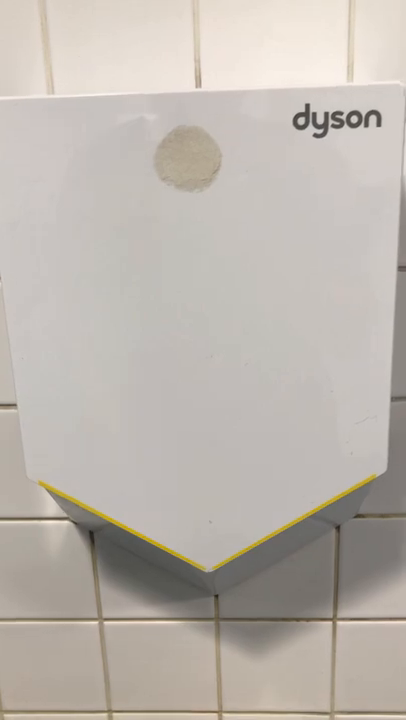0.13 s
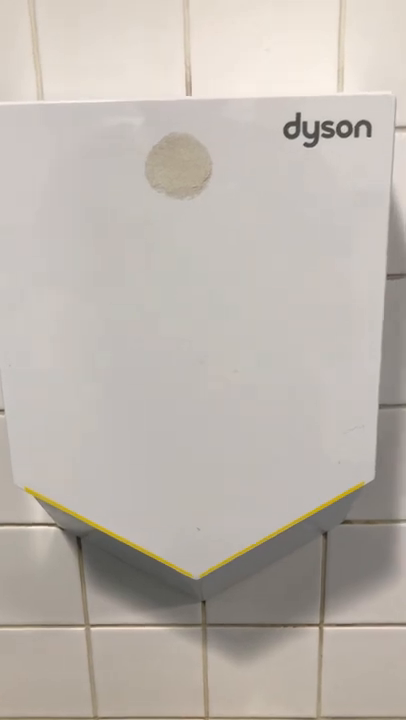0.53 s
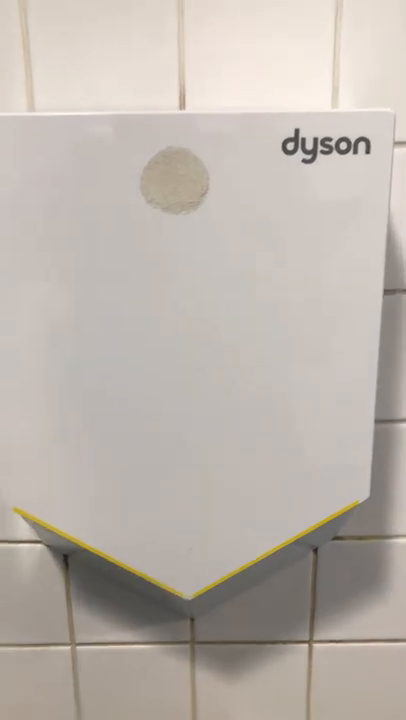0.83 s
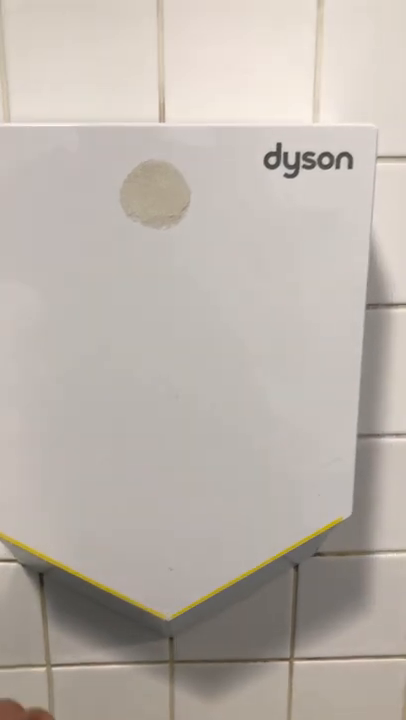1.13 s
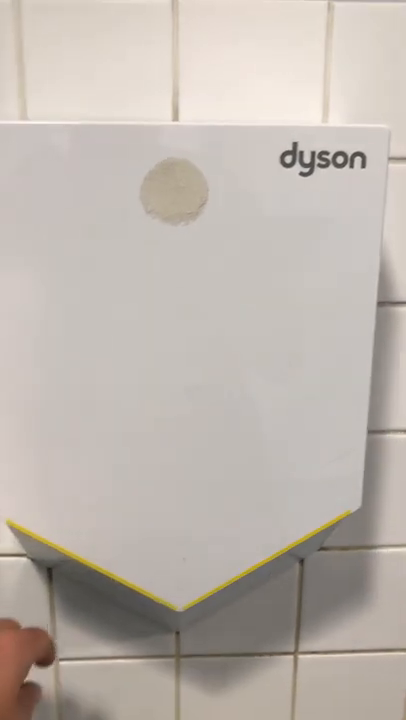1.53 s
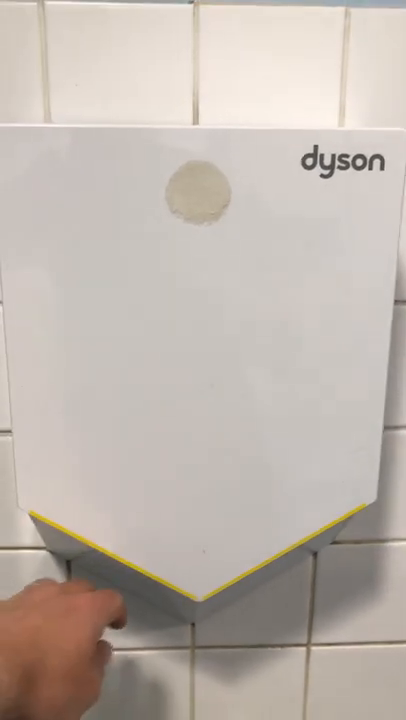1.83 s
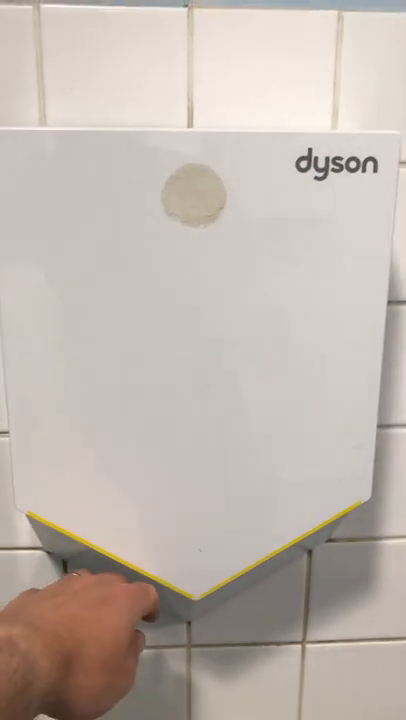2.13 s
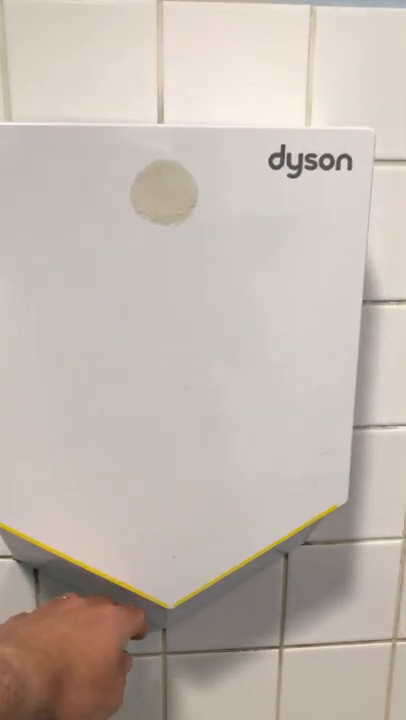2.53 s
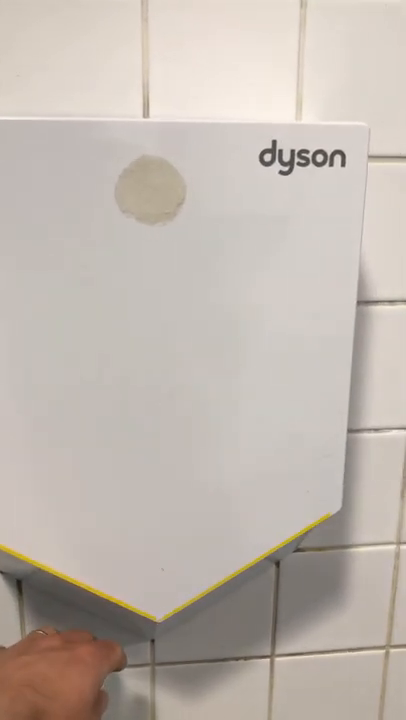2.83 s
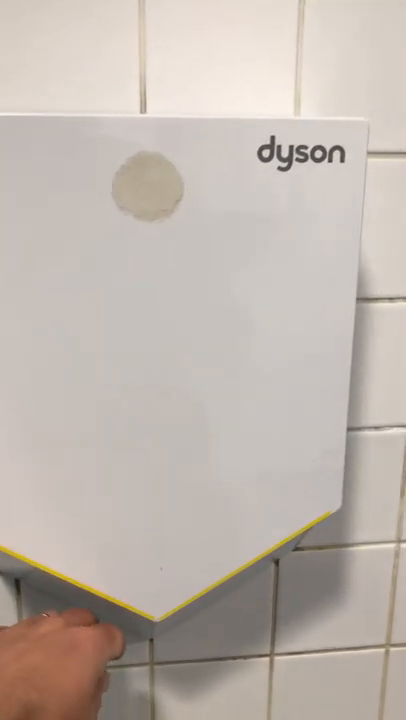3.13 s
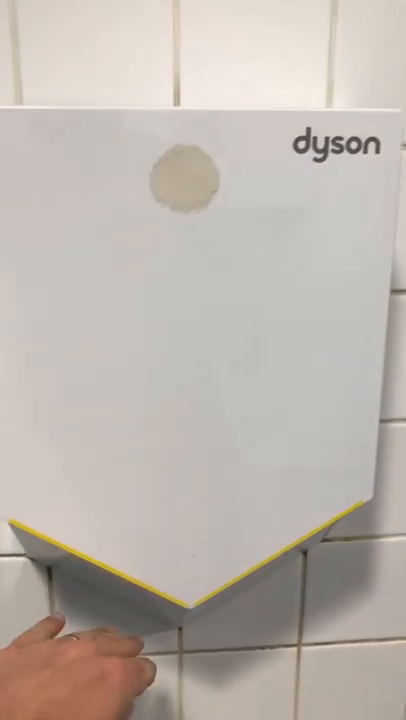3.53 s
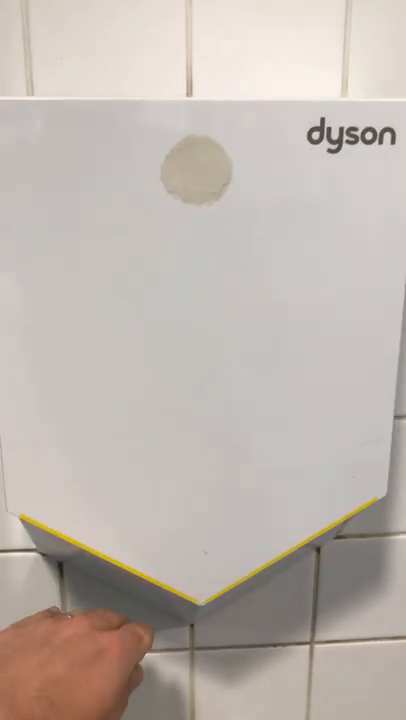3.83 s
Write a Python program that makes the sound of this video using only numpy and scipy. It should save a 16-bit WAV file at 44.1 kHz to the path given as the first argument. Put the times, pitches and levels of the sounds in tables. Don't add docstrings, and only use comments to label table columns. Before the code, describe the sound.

After a quiet washroom lull, a wall hand dryer ticks, spins up and roars with air

```python
import sys
import numpy as np
from scipy import signal
from scipy.fft import rfft, irfft, next_fast_len
from scipy.io import wavfile
from scipy.ndimage import uniform_filter1d, map_coordinates

SR = 44100
rng = np.random.default_rng(int(sys.argv[2]) if len(sys.argv) > 2 else 0)


def wav_out(sig):
    wavfile.write(sys.argv[1], SR, np.round(np.clip(np.atleast_2d(sig).T, -1, 1) * 32767).astype(np.int16))


def undo_db(level):
    steps = np.asarray(level, float) / 20
    return 10 ** steps


N = 176400
T = np.arange(N) / SR


def unit(x):
    return x / np.sqrt(np.mean(x ** 2) + 1e-20)


def along(points, hz):
    f, v = np.transpose(points)
    return np.interp(np.log(hz + 1), np.log(f + 1), v)


def curves(rows):
    s, *cols = np.transpose(rows)
    return [np.interp(T, s, c) for c in cols]


def wobble(rate_hz):
    knots = rng.standard_normal(int(N * rate_hz / SR) + 4)
    return map_coordinates(knots, [T * rate_hz])


def sine(hz):
    return np.sin(2 * np.pi * np.cumsum(hz) / SR)


def filtered(x, response):
    m = next_fast_len(N + SR // 2)
    return irfft(rfft(x, m) * response(np.fft.rfftfreq(m, 1 / SR)), m)[..., :N]


def peak(f, hz, width_hz):
    return 1j * f * width_hz / (hz * hz - f * f + 1j * f * width_hz)


def rush(spectrum, patchy_db):
    z = signal.stft(rng.standard_normal(N), nperseg=512)[2]
    field = uniform_filter1d(rng.standard_normal(z.shape), 6, 0)
    field = uniform_filter1d(field, 10, 1)
    x = signal.istft(z * undo_db(patchy_db * unit(field)), nperseg=512)[1][:N]
    return unit(filtered(x, lambda hz: undo_db(along(spectrum, hz))))


def swelling_tones(rows):
    total = np.zeros(N)
    for start_s, hz, db, length_s in rows:
        swell = np.sin(np.pi * np.clip((T - start_s) / length_s, 0, 1))
        tone = sine(hz * (1 + .012 * wobble(90)))
        total += undo_db(db + 2.5 * wobble(120)) * swell * tone
    return total


# frequency in Hz, level in dB.
VENT_SPECTRUM = [(20, -6), (170, -3.5), (450, -12.5), (750, -14.5), (1200, -16.5), (2200, -25.5),
                 (3500, -43), (8000, -46)]
# frequency in Hz, width in Hz, level in dB.
DUCT_WHISTLES = [(70.6, 30, -64.5), (101.36, 12, -71), (563, 27, -79), (750, 25, -80), (918, 20, -73),
                 (997, 40, -76), (1500, 30, -82), (2030, 110, -81)]
# time in seconds, level in dB.
PLUMBING_LEVEL = [(0, -69.5), (.3, -68), (.9, -68), (1.1, -70.5), (1.7, -69.5), (2.1, -68.5), (2.45, -69)]
# frequency in Hz, level in dB.
PLUMBING_SPECTRUM = [(800, -20), (2000, 0), (4000, -4), (6500, -6), (9000, -9), (12000, -11), (15800, -10)]


def washroom():
    whistles = np.zeros(N)
    for hz, width_hz, db in DUCT_WHISTLES:
        tone = unit(filtered(rng.standard_normal(N), lambda f: peak(f, hz, width_hz) ** 2))
        waver_db = 1.8 * (hz > 500) * wobble(5)
        whistles += undo_db(db + waver_db) * tone
    plumbing = undo_db(curves(PLUMBING_LEVEL)[0]) * rush(PLUMBING_SPECTRUM, patchy_db=-1.5)
    vent = undo_db(-60 + .5 * wobble(3)) * rush(VENT_SPECTRUM, patchy_db=1)
    return vent + plumbing + whistles


# time in seconds, frequency in Hz, level in dB.
PIPE_SONG = [(0, 990, -69), (.59, 985, -68), (.72, 998, -72), (.82, 988, -63), (.9, 990, -67),
             (.98, 990, -62), (1.1, 992, -67), (1.37, 984, -66), (1.42, 985, -78), (1.54, 988, -63),
             (1.67, 991, -72), (1.74, 986, -63), (1.79, 988, -72), (1.93, 997, -63), (2.03, 995, -68),
             (2.18, 994, -74), (2.245, 994, -62), (2.3, 995, -72)]
# start in seconds, frequency in Hz, level in dB, length in seconds.
PIPE_SQUEAKS = [
    (1.755, 550, -63, .1),
    (1.64, 3280, -79, .28),
    (.04, 560, -66, .13),
    (2.08, 3820, -80, .3),
    (2.26, 1320, -65, .08),
]


def pipe():
    hz, db = curves(PIPE_SONG)
    song = undo_db(db + 2.5 + 1.5 * wobble(35)) * sine(hz + 3 + 4 * wobble(30))
    return song + swelling_tones(PIPE_SQUEAKS)


# frequency in Hz, level in dB.
HUM = [(100, -41), (200, -38.5), (300, -52)]


def supply():
    hum = np.zeros(N)
    for hz, db in HUM:
        hum += undo_db(db + 3.5 + 1.2 * wobble(7)) * np.sin(2 * np.pi * hz * T)
    load = np.clip((T - 2.5) / 0.16, 0, 1) ** 1.3
    return load * hum


# start in seconds, length in seconds, level in dB.
SLEEVE_BRUSHES = [
    (1.196, 0.055, -63),
    (1.25, 0.175, -73.5),
    (2.05, 0.31, -78),
]
# frequency in Hz, level in dB.
CLOTH_SPECTRUM = [(1000, -30), (1800, -5), (2500, -2), (4000, -4), (5600, 0), (8000, -7), (15000, -14)]


def sleeve():
    shape = np.zeros(N)
    for start_s, length_s, db in SLEEVE_BRUSHES:
        rise = np.clip((T - start_s) / .012, 0, 1)
        fall = np.clip((start_s + length_s * 1.5 - T) / length_s, 0, 1)
        shape += undo_db(db) * rise * fall
    return shape * rush(CLOTH_SPECTRUM, patchy_db=.8)


# time in seconds, peak level in dB.
KNOCKS = [(1.8821, -41.5), (1.915, -52), (1.9609, -48), (2.0028, -45), (2.0294, -50), (2.063, -45),
          (2.1294, -49), (2.2413, -46), (2.2747, -45), (2.3094, -48), (2.3496, -54)]
# frequency in Hz, level in dB, t60 in seconds.
FITTING_MODES = [(1050, -5, .04), (1300, 0, .05), (1500, -4, .04), (1750, -1, .04), (1950, -4, .03),
                 (2750, -8, .03)]
# frequency in Hz, level in dB.
SCUFF_SPECTRUM = [(500, -19), (800, -5), (1300, 5), (2000, -4), (3000, -11), (4500, -29)]


def fitting():
    knocks, scuffs, t = np.zeros(N), np.zeros(N), T[:SR // 5]
    scuff_db, scuff_decay_s = -19, .055
    for start_s, db in KNOCKS:
        ring = np.zeros(len(t))
        for hz, mode_db, t60_s in FITTING_MODES:
            decay = undo_db(mode_db + rng.normal(0, 2.5) - 60 * t / t60_s)
            ring += decay * np.sin(2 * np.pi * hz * rng.normal(1, .05) * t)
        here = slice(round(start_s * SR), round(start_s * SR) + len(t))
        knocks[here] += undo_db(db - 14) * ring * (1 - np.exp(-t / .004))
        scuff = np.exp(-t / scuff_decay_s) * (1 - np.exp(-t / .006))
        scuffs[here] += undo_db(db + scuff_db) * scuff
    return knocks + scuffs * rush(SCUFF_SPECTRUM, patchy_db=3.5)


# time in seconds, level in dB.
RELAY_TICKS = [
    (2.483, -51.5),
    (2.497, -60),
    (2.507, -49),
]


def relay():
    bursts = np.zeros(N)
    for start_s, db in RELAY_TICKS:
        bursts += undo_db(db + 21) * (T >= start_s) * np.exp(-np.abs(T - start_s) / .0018)
    return bursts * rng.standard_normal(N)


# frequency in Hz, width in Hz, level in dB.
CASING_MODES = [(820, 70, -10), (1230, 70, -1), (1500, 110, 1), (1700, 110, 4), (1920, 130, 2),
                (2420, 200, -9), (3050, 150, -9), (3420, 120, 0), (4050, 150, -3), (4320, 150, 4),
                (4680, 150, -2)]


def casing(f):
    total = 0
    for k, (hz, width_hz, db) in enumerate(CASING_MODES):
        total = total + (-1) ** k * undo_db(db) * peak(f, hz, width_hz)
    return total / (1 + (f / 5600) ** 8)


# time in seconds, winding pulse rate in Hz, whine level in dB.
RUN_UP = [
    (2.497, 60, -90),
    (2.512, 320, -44),
    (2.54, 880, -43),
    (2.58, 1730, -35),
    (2.652, 3303, -36),
    (2.716, 4430, -34),
    (2.775, 5250, -27),
    (2.83, 5900, -22),
    (2.95, 6050, -40),
]
# time in seconds, level in dB.
BUZZ = [
    (2.497, -68),
    (2.51, -46),
    (2.55, -36.5),
    (2.6, -37),
    (2.7, -45),
    (3.05, -38),
]
# multiple of the pulse rate, level in dB.
WINDING_ORDERS = [(1, 0), (2, -3), (3, -2), (4, -7), (5, -10), (6, -12)]


def motor():
    rate_hz, whine_db = curves(RUN_UP)
    buzz_db = curves(BUZZ)[0]
    waver_db = 3
    phase = 2 * np.pi * np.cumsum(rate_hz * (1 + .015 * wobble(200))) / SR
    whine = np.zeros(N)
    for order, db in WINDING_ORDERS:
        audible = order * rate_hz < SR / 2.5
        whine += undo_db(db + waver_db * wobble(110)) * np.sin(order * phase) * audible
    drive = undo_db(whine_db + 5.5) * whine
    buzz = undo_db(buzz_db + 11) * rng.standard_normal(N) * (T > BUZZ[0][0])
    body = filtered(drive + buzz + relay(), casing)
    leak = undo_db(-30) * filtered(drive, lambda f: peak(f, 1700, 1500))

    kick_s, kick_hz, kick_db, kick_t60_s = 2.515, 74, -36, .4
    since_s = np.clip(T - kick_s, 0, None)
    kick = undo_db(kick_db - 60 * since_s / kick_t60_s) * (1 - np.exp(-since_s / .02))
    kick = kick * np.sin(2 * np.pi * kick_hz * since_s)

    critical_s, span_s, critical_db, rest_db, turns_per_pulse = 2.805, .035, -28, -40, .2
    swell = undo_db(critical_db) * np.exp(-((T - critical_s) / span_s) ** 2)
    swell = swell + undo_db(rest_db) * (rate_hz / rate_hz[-1]) ** 2
    shaft = swell * undo_db(waver_db * wobble(30)) * np.sin(turns_per_pulse * phase)
    return body + leak + shaft + kick


# start in seconds, frequency in Hz, level in dB, length in seconds.
PANEL_TONES = [(2.486, 1900, -49, .045), (2.503, 1260, -41, .035), (2.5, 3340, -41, .045),
               (2.525, 2400, -43, .04), (2.505, 4150, -44, .04), (2.53, 4480, -38, .045),
               (2.535, 4730, -41, .05), (2.545, 1200, -36, .04), (2.59, 4300, -36, .022),
               (2.59, 2400, -36, .13)]


def panels():
    return swelling_tones(PANEL_TONES)


# time in seconds, jet hiss in dB, roar on the hand in dB, duct rumble in dB.
AIR_LEVELS = [(2.5, -90, -56, -48), (2.531, -54, -44, -47), (2.541, -41.5, -50, -38),
              (2.58, -34, -35, -46.5), (2.65, -26, -30.5, -34.5), (2.7, -22.5, -25, -31.5),
              (2.8, -18.5, -21.5, -25), (2.9, -18, -21.5, -23.5), (3.06, -20, -21, -24),
              (3.14, -18.5, -18.5, -23.5), (3.29, -18, -18, -27.5), (3.42, -19.5, -19.5, -24),
              (3.56, -20, -20, -26), (3.75, -19.5, -19, -25), (3.9, -19, -18.5, -26),
              (4, -17, -16.5, -26.5)]
# frequency in Hz, level in dB.
JET_SPECTRUM = [(2000, -27), (4000, -1.5), (6000, -1.5), (8000, -3), (10000, -2.5), (12000, -2.5),
                (14000, -3), (15800, -7)]
ROAR_SPECTRUM = [(300, -33), (800, -5.5), (1200, -1), (2200, 0), (3300, -2.5), (4500, -7), (7000, -13),
                 (12000, -53)]
RUMBLE_SPECTRUM = [(20, -44), (50, -11), (120, -6), (300, -3), (550, -1.5), (850, -2), (1600, -11),
                   (5000, -60)]


def air():
    jet_db, roar_db, rumble_db = curves(AIR_LEVELS)
    shared_db = .5 * wobble(7) + .36 * wobble(120)
    jet = undo_db(jet_db + shared_db + .87 * wobble(30)) * rush(JET_SPECTRUM, patchy_db=.2)
    opens_s, rise_s = 2.531, .003
    jet = jet * np.clip((T - opens_s) / rise_s, 0, 1)
    roar = undo_db(roar_db + shared_db + .6 * wobble(14)) * rush(ROAR_SPECTRUM, patchy_db=.9)
    rumble = undo_db(rumble_db + .3 * wobble(6)) * rush(RUMBLE_SPECTRUM, patchy_db=.4)
    return (jet + roar + rumble) * (T > AIR_LEVELS[0][0])


# frequency in Hz, t60 in seconds.
TILE_DECAY = [(200, 0.77), (2000, 0.12), (10000, 0.15)]


def tiles(x):
    hz, t, z = signal.stft(rng.standard_normal(SR // 2), SR, nperseg=256)
    decay = undo_db(-60 * t / along(TILE_DECAY, hz)[:, None])
    tail = signal.istft(z * decay, SR, nperseg=256)[1]
    delayed = np.pad(x, (200, 0))
    return signal.fftconvolve(delayed, tail / np.linalg.norm(tail))[:N]


def scene():
    near = sleeve() + fitting() + motor() + panels() + air()
    wet_db = -12
    mix = washroom() + pipe() + supply() + near + undo_db(wet_db) * tiles(near)
    return np.tile(mix, (2, 1))


# frequency in Hz, width in Hz, depth in dB.
BODY_DIPS = [(4950, 300, -3), (7700, 600, -4), (10350, 450, -6)]


def phone_body(f):
    db = sum(depth_db * np.exp(-((f - hz) / width_hz) ** 2) for hz, width_hz, depth_db in BODY_DIPS)
    return undo_db(db) * np.clip((15830 - f) / 60, 0, 1)


# center in seconds, low edge in Hz, high edge in Hz.
WIDE_BANDS = [(1.3, 11000, 12500), (1.3, 14500, 15800), (1.44, 11700, 13100), (3.042, 5500, 7000),
              (3.042, 7600, 9100), (3.228, 5000, 6400), (3.228, 7500, 9800), (3.228, 13600, 15800),
              (3.553, 11600, 15800), (3.599, 11000, 13900), (3.599, 14400, 15800), (3.669, 6200, 9800)]


def wide_bands(mid):
    other, length_s, total = np.roll(mid, -3000), .046, np.zeros(N)
    for center_s, low_hz, high_hz in WIDE_BANDS:
        window = np.cos(np.pi * np.clip((T - center_s) / length_s, -.5, .5)) ** 1.5
        total += filtered(window * other,
                          lambda f: np.clip(np.minimum(f - low_hz, high_hz - f) / 80, 0, 1))
    return undo_db(-3) * total


def top_cut(x):
    return signal.sosfilt(signal.butter(12, 15830, fs=SR, output="sos"), x)


def record(dry):
    start_s = .036
    mid = filtered(dry[0], phone_body) * (T > start_s)
    side = wide_bands(mid)
    return top_cut(np.array([mid + side, mid - side]))


dry = scene()
out = record(dry)
wav_out(out)
```